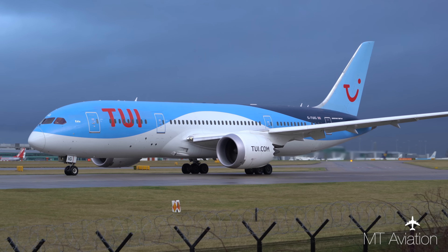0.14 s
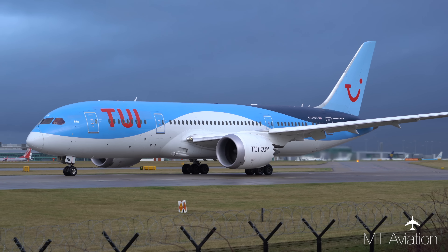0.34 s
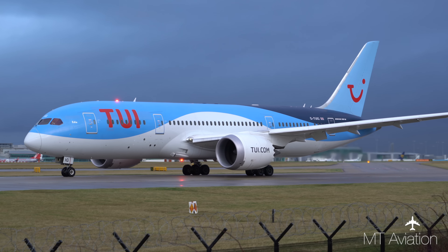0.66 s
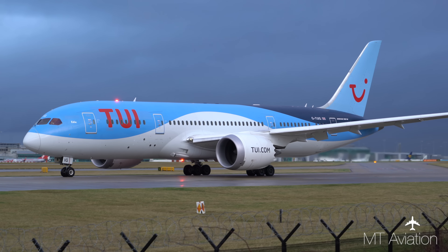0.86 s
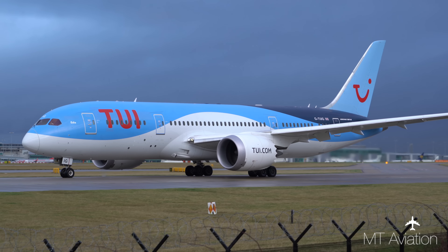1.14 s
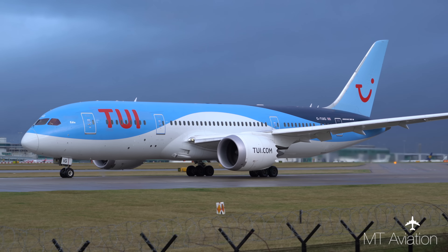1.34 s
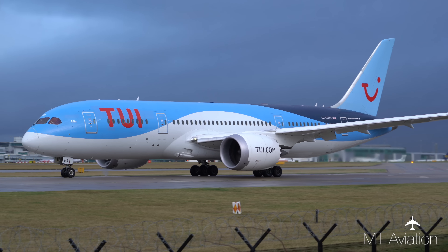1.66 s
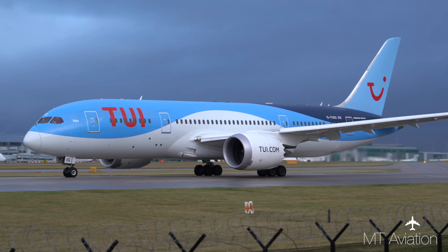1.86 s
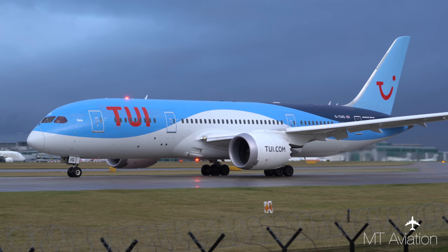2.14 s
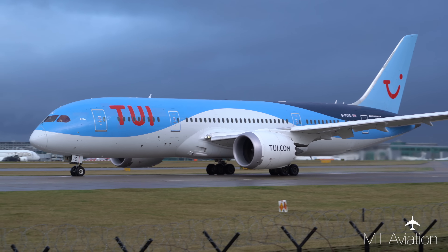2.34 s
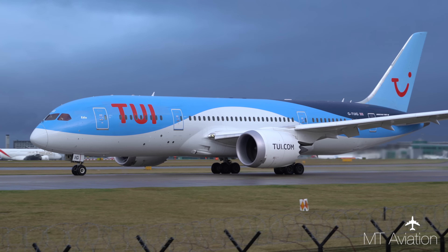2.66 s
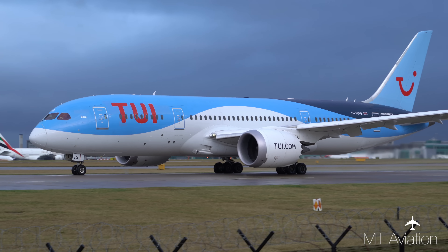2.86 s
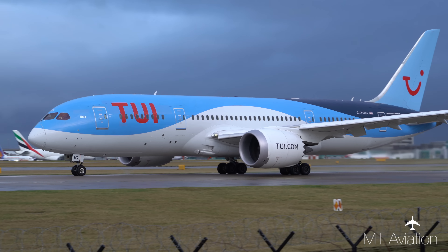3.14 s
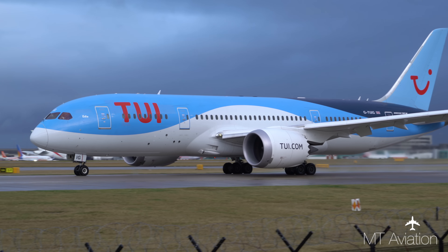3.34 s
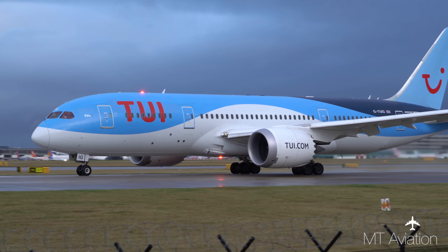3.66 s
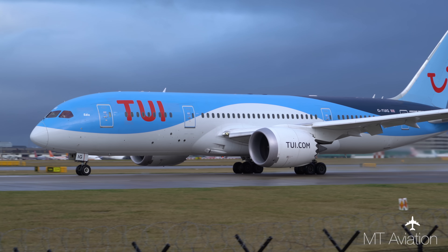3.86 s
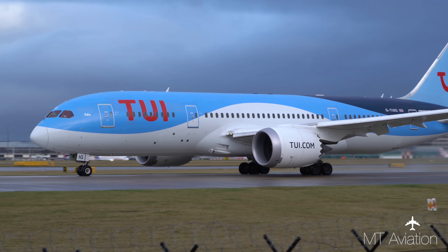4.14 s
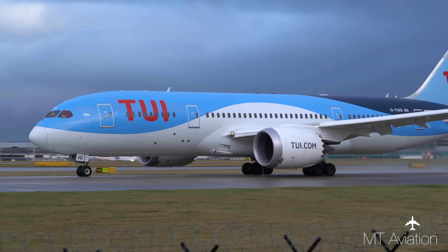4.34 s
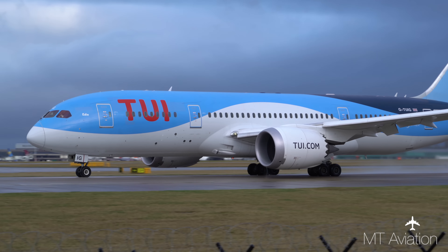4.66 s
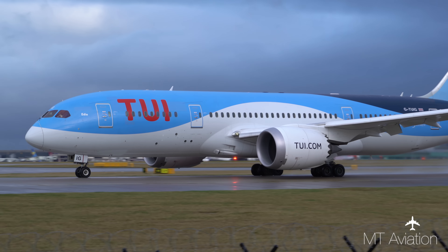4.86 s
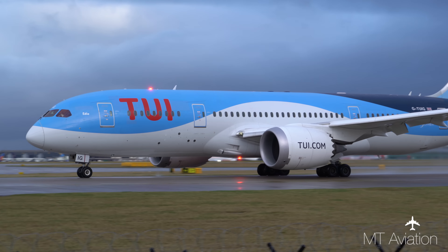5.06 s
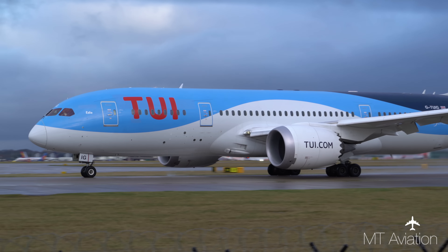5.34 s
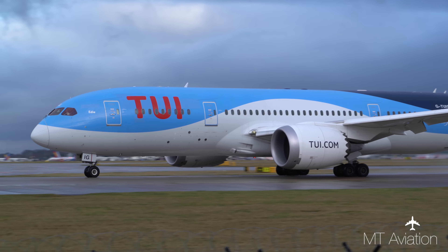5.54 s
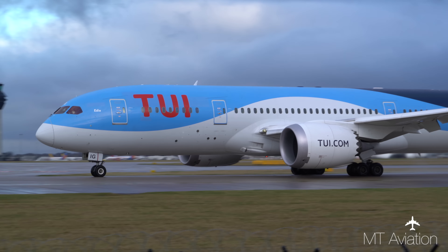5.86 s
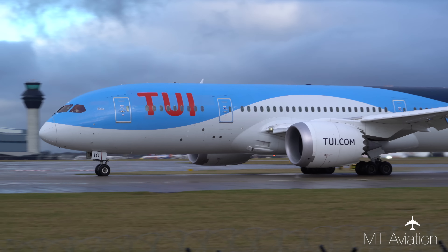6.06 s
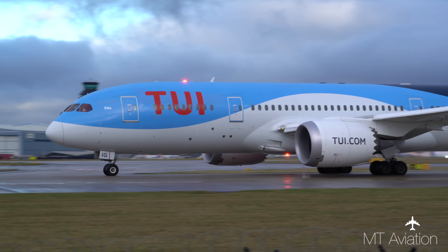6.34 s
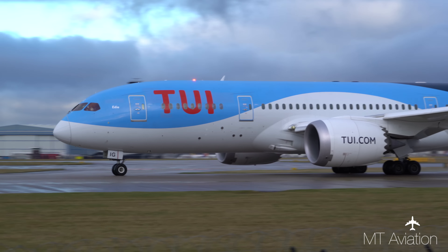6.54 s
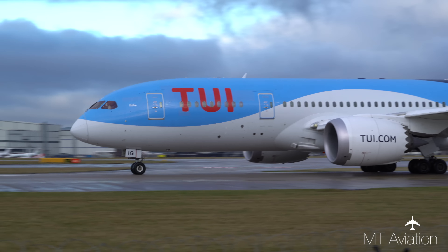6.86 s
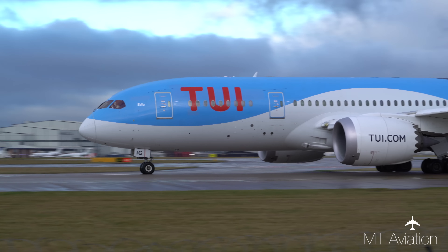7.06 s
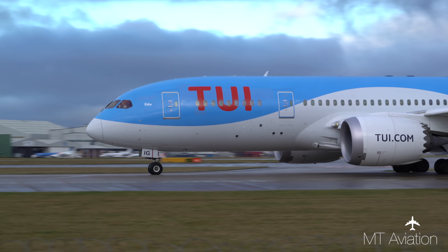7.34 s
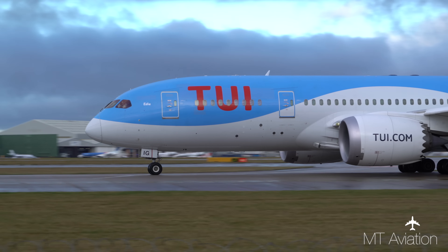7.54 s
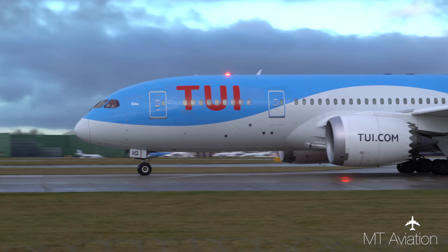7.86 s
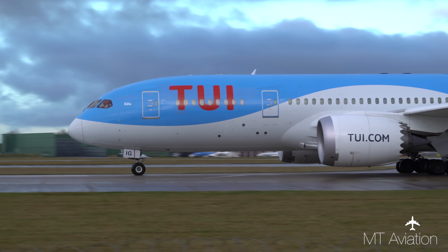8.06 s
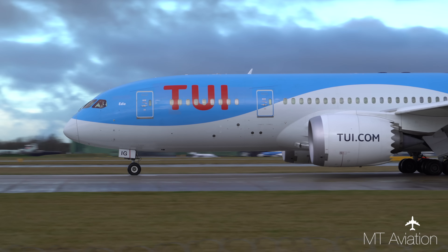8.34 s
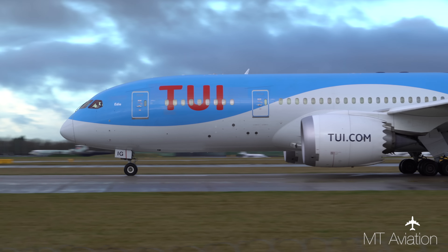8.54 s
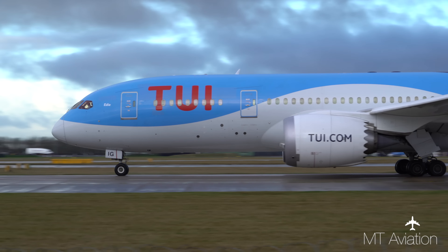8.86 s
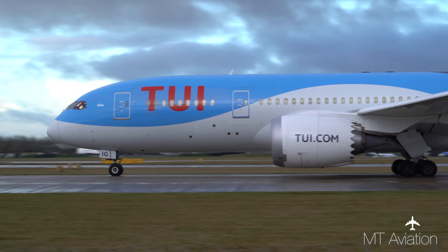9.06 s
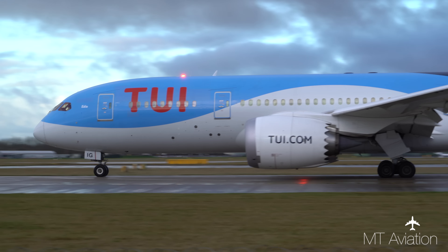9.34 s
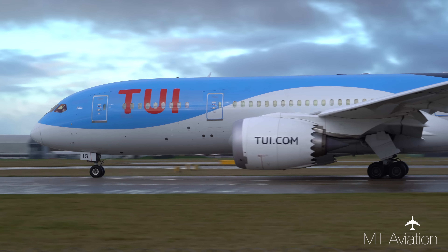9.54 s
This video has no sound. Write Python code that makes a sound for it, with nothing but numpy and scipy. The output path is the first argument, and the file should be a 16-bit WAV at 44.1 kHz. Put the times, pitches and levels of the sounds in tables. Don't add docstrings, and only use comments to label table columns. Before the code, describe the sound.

Jet engines climb from a whistling hum to a singing, fluttering howl, then a full rushing roar takes over as the airliner draws level outdoors.

```python
import sys
import numpy as np
from scipy import signal
from scipy.fft import rfft, irfft
from scipy.io import wavfile
from scipy.ndimage import uniform_filter1d, minimum_filter1d, map_coordinates

SR = 44100
rng = np.random.default_rng(int(sys.argv[2]) if len(sys.argv) > 2 else 0)


def undo_db(level):
    steps = np.asarray(level, float) / 20
    return 10 ** steps


def transcribe(signal):
    frames = np.atleast_2d(signal).T
    limited = np.clip(frames, -1, 1)
    pcm = np.round(limited * 32767).astype(np.int16)
    wavfile.write(sys.argv[1], SR, pcm)


N = 428211
CLOCK = np.arange(N) / SR
BINS = np.maximum(np.fft.rfftfreq(N, 1 / SR), 1)

# f/Hz, share of the panning, incoherent share far off, incoherent share abeam
PAIR = [(86.4, 0.0, .001, .001), (137, 0.0, 0.017, 0.023), (180, 0.12, 0.043, 0.089),
        (300.6, 0.11, 0.011, 0.06), (700.2, 0.64, 0.029, 0.017), (1400, 1.08, 0.082, 0.021),
        (3160, 1.07, 0.1, 0.37), (7140, 1.56, 0.095, 0.66), (14100, 1.6, 0.28, 0.25)]
# t/s, nearness (0 far ahead - 1 abeam)
APPROACH = [(0, 0.1), (2, 0.12), (3.2, 0.26), (5.2, 0.35), (6.2, 0.52), (7, 0.73), (8, 0.99), (9.71, 0.98)]
# f/Hz, idle level/dB, gain at full thrust/dB, gain abeam/dB
NOISE_DRIVE = [(115, -11, 8.5, 2), (213, -6, 0.2, 9.5), (1510, 1.83, -1.3, 0.56), (8100, -0.14, 2, -3.5)]


def near_fan(pan_db):
    # harmonic, from t/s, until t/s, level/dB
    near_beams = [(1, 1.96, 9.9, -33.5), (2, 2.1, 6.92, -29.5), (3, 1.1, 6.6, -32.5), (4, .4, 6.1, -33.5)]
    # t/s, harmonic, length/s, peak level/dB
    near_swells = [(1.762, 3, 0.08, -27), (1.92, 4, 0.35, -37), (2.106, 1, 0.074, -25.5),
                   (2.394, 2, 0.1, -27), (2.46, 3, 0.26, -26), (2.594, 2, 0.16, -26),
                   (2.636, 1, 0.13, -19.5), (2.77, 1, 0.048, -21.5), (3.023, 1, 0.26, -19.5),
                   (3.307, 2, 0.24, -23), (3.4, 1, 0.16, -27), (3.476, 3, 0.078, -23.5),
                   (3.606, 2, 0.057, -19), (3.668, 1, 0.057, -26.6), (3.74, 4, 0.15, -25),
                   (3.78, 3, 0.25, -30), (3.87, 1, 0.079, -21), (4.071, 1, 0.17, -21), (4.411, 3, 0.1, -27),
                   (4.505, 1, 0.16, -25), (4.88, 3, 0.14, -22), (5.184, 2, 0.3, -28),
                   (5.347, 2, 0.079, -28), (5.76, 2, 0.24, -51), (6.14, 1, 0.1, -26.3),
                   (6.461, 2, 0.1, -24), (6.72, 1, 0.2, -28.5), (6.781, 2, 0.19, -29),
                   (7.007, 1, 0.078, -24), (9.21, 1, 0.1, -30),
                   (3.04, 1, 0.94, -30), (2.8, 2, 0.83, -29), (1.96, 3, 0.69, -32), (2.3, 4, 0.54, -35),
                    (.55, 4, 0.13, -30), (0.97, 2, 0.41, -31), (1, 4, .25, -67), (1.7, 2, 0.46, -32.5),
                    (2.05, 3, 0.67, -32), (5.55, 3, .3, -26.5), (6.315, 3, .2, -31), (7.65, 1, 0.24, -30.5),
                    (8.551, 1, 0.16, -30), (5.396, 1, .12, -29), (5.75, 1, 0.055, -38)]
    blade_hz = blade_rate()
    rest_db = -44.5 - 6 * np.clip(CLOCK - 6.5, 0, 1)
    slow_db = 4.5 * np.clip(2 - CLOCK, 0, 1)
    stack = 0
    for beam in near_beams:
        k = round(beam[0])
        floor_db = rest_db - (k == 1) * slow_db
        line_db = soft_floor(harmonic_db(beam, near_swells), floor_db)
        line = tone(k * blade_hz, line_db, wander_hz=5.5 * k, flicker_db=2.8)
        stack = stack + panned(line, k * blade_hz, pan_db)
    return stack


def far_fan(pan_db):
    # t/s, lead/%
    fan_lead = [(0, 0), (1.6, 0.21), (2.3, 1.34), (3.2, 1.32), (4.4, 0.034), (9.71, 0)]
    # harmonic, from t/s, until t/s, level/dB
    far_beams = [(5, 2.6, 6.1, -34.5), (6, 2.105, 3.3, -36), (7, 2.23, 2.876, -40), (8, 2.5, 3.5, -42),
                 (9, 2.6, 3.1, -39)]
    # t/s, harmonic, length/s, peak level/dB
    far_swells = [(.35, 6, .12, -30), (1.32, 6, .15, -29), (1.33, 5, .25, -29), (1.55, 7, .15, -32),
                  (2.12, 6, .12, -29), (2.32, 7, .13, -31), (2.37, 6, .14, -25.5), (2.72, 9, .3, -36),
                  (2.75, 7, .35, -32), (2.72, 6, .1, -30), (2.78, 8, .45, -27), (2.96, 6, .18, -31),
                  (3.07, 5, .12, -28), (3.5, 6, .13, -33)]
    # harmonic, level/dB
    high_harmonics = [(10, -43), (11, -44), (12, -40), (13, -49)]
    lead = curves(fan_lead)[0]
    blade_hz = blade_rate() * (1 + lead / 100)
    spool_db = 10.0 * (np.clip(lead, 0, 1.4) - 1.4)
    stack = 0
    for beam in far_beams:
        k = round(beam[0])
        line_db = soft_floor(harmonic_db(beam, far_swells), spool_db - 45.0)
        line = tone(k * blade_hz, line_db, wander_hz=12.97, flicker_db=2.5)
        stack = stack + panned(line, k * blade_hz, pan_db)
    for k, line_db in high_harmonics:
        line = tone(round(k) * blade_hz, line_db + spool_db, wander_hz=14.6, flicker_db=5.0)
        stack = stack + panned(line, k * blade_hz, pan_db)
    return stack


def blade_rate():
    # t/s, blade-passing f/Hz
    spool_up = [(0, 331.4), (.5, 337.3), (1, 345), (1.25, 359.7), (1.5, 388), (2, 464), (2.25, 504.5),
                (2.5, 535), (2.75, 562.7), (3, 584), (3.5, 619.7), (4, 648), (4.5, 660.3), (5, 668.3),
                (6, 692), (7, 695.6), (9.71, 701.4)]
    return uniform_filter1d(curves(spool_up)[0], size=SR // 6, mode="nearest")


def harmonic_db(beam, swells):
    k, begin, end, beam_db = beam
    rise_db_s, fall_db_s = 21, 29
    line_db = beam_db - rise_db_s * np.maximum(begin - CLOCK, 0) - fall_db_s * np.maximum(CLOCK - end, 0)
    for t, harmonic, length, peak_db in swells:
        if round(harmonic) == round(k):
            line_db = soft_floor(line_db, peak_db - 3.0 * (2 * (CLOCK - t) / length) ** 2)
    return line_db


def tone(line_hz, line_db, wander_hz=7.0, flicker_db=3.5):
    phase = 2 * np.pi * np.cumsum(line_hz + wander_hz * walk(50.0)) / SR
    flicker = undo_db(flicker_db * walk(40.0))
    flicker = flicker / np.sqrt(np.mean(flicker ** 2))
    return np.sqrt(2) * undo_db(line_db) * flicker * np.sin(phase + 2 * np.pi * rng.random())


def roar(delay_ms, bounce, pan_db, scatter):
    # f/Hz, level/dB (the second column)
    colour = [(25, -49), (60, -16.5), (115, -8), (158, -12), (172, -19), (300, -13.5), (450, -4), (900, -2),
              (2000, -1), (4000, -4.5), (7000, -14), (9800, -24), (11500, -36), (15600, -49.5)]
    drive_db = noise_drive_db()
    drive_log_hz = np.log(np.array(NOISE_DRIVE)[:, 0])
    shape = undo_db(at(BINS, colour))
    spectra = [bounced(rfft(rng.standard_normal(N)) * shape, delay_ms, bounce) for _ in range(3)]
    gust, eddy = walk(11.0), walk(36.0)
    noise = np.zeros((2, N))
    for band_hz in 28 * 2 ** np.arange(0, 9.6, .5):
        mask = np.cos(np.pi * np.clip(np.log2(BINS / band_hz), -.5, .5)) ** 2
        place = np.interp(np.log(band_hz), drive_log_hz, np.arange(4))
        below = min(int(place), 2)
        band_db = drive_db[below] + (place - below) * (drive_db[below + 1] - drive_db[below])
        treble_waver = .3 * gust + 1.05 * eddy + 1.0 * walk(24.0)
        band_db = band_db + min(band_hz / 7000, 1) * treble_waver + .3 * walk(8.0)
        band_db = band_db + 0.42 * drive_db[0] * np.clip(np.log2(140 / band_hz), 0, 1)
        band_db = band_db + 25.0 * (scatter - .4) * max(np.log2(band_hz / 8000), 0)
        shared, left, right = (irfft(spectrum * mask, N) for spectrum in spectra)
        apart = at(band_hz, PAIR, count=2) * (1 - scatter) + at(band_hz, PAIR, count=3) * scatter
        apart = np.clip(apart, 0, 1)
        pair = np.sqrt(1 - apart) * shared + np.sqrt(apart) * np.array([left, right])
        noise += panned(undo_db(band_db) * pair, band_hz, pan_db)
    return noise * undo_db(-15.5) / noise.std()


def noise_drive_db():
    # t/s, length/s, change/dB
    surges = [(0.37, 0.29, 2.3), (1.03, 0.37, -1), (1.33, 0.38, 0), (1.69, 0.29, -1), (2.82, 0.34, 4),
              (3.29, 0.36, -1), (4.61, 0.4, 1), (4.98, 0.24, -3.5), (5.61, 0.46, 1), (6.84, 0.94, 1),
              (8.99, 0.26, -4.5), (9.37, 0.18, 1)]
    # t/s, length/s, change/dB
    gusts = [(0.39, 0.08, -2.2), (0.67, 0.23, 0.7), (1.3, 0.15, -2.2), (1.54, 0.24, 2), (2.16, 0.57, -0.8),
             (2.56, 0.17, 2.5), (2.9, 0.11, 1.6), (3.1, 0.23, -2.5), (3.26, 0.17, 2.5), (3.4, 0.13, -2),
             (3.51, 0.17, 1.5), (4.46, 0.078, -2.1), (4.78, 0.15, -2), (4.98, 0.19, 2), (5.18, 0.24, -1.5),
             (5.46, 0.078, 2), (6.2, 0.085, 1.5), (6.75, 0.36, -1.4), (7.04, 0.055, -1.8), (7.39, 0.3, 0.3),
             (7.93, 0.24, -1.9), (8.43, 0.31, 0.4), (8.93, 0.16, -1), (9.55, 0.083, 2)]
    # t/s, length/s, change/dB
    ducks = [
        (2.1, .3, 1.0),
        (2.6, 0.44, -2),
        (3.3, 0.67, -1.7),
        (4.0, .25, 0),
        (4.75, 0.31, 1.2),
        (6.5, .4, 0.5),
        (8.2, .3, -1),
        (9.1, .3, -1),
    ]
    blade_hz = blade_rate()
    thrust = (blade_hz - blade_hz.min()) / np.ptp(blade_hz)
    abeam = curves(APPROACH)[0]
    boom = 1 / (1 + np.exp((0.59 - thrust) / 0.098))
    surge, gust = bumps(surges), bumps(gusts)
    drives = [boom, thrust, thrust, thrust]
    air_db = [surge, 0.12 * surge, 0.05 * gust + bumps(ducks), 1.22 * gust]
    waver_db = [1, 1, .25, -0.6]
    levels = []
    for (_, idle_db, thrust_db, abeam_db), drive, air, waver in zip(NOISE_DRIVE, drives, air_db, waver_db):
        steady_db = idle_db + thrust_db * drive + abeam_db * abeam
        levels.append(steady_db + air + waver * walk(6.3))
    return np.array(levels)


def bounced(spectrum, delay_ms, bounce):
    phase_rad, top_hz = 0.41, 1120
    ground = spectrum * np.exp(-1j * phase_rad) / np.sqrt(1 + (BINS / top_hz) ** 2)
    reflection = delayed(irfft(ground, N), delay_ms * SR / 1000)
    return spectrum + rfft(np.clip(bounce, 0, 1) * reflection)


def humps(pan_db):
    # harmonic, half width/Hz, level/dB
    scattered = [(2, 90, -36.5), (4, 160, -32), (6, 180, -43), (8, 200, -28)]
    blade_hz = blade_rate()
    idle = np.clip((2.0 - CLOCK) / 0.93, 0, 1)
    turns = 2 * np.pi * np.cumsum(blade_hz) / SR
    total = 0
    for k, width_hz, hump_db in scattered:
        in_phase = walk(width_hz) * np.cos(round(k) * turns)
        quadrature = walk(width_hz) * np.sin(round(k) * turns)
        hump = idle * undo_db(hump_db) * (in_phase + quadrature)
        total = total + panned(hump, k * blade_hz, pan_db)
    return total


def whistles(pan_db):
    # from t/s, until t/s, f/Hz, level/dB
    compressor = [
        (-.1, 0.713, 3710, -28),
        (0.306, .85, 5010, -34),
        (3.705, 5.298, 1592, -33.5),
        (5.203, 5.898, 1630, -37),
        (-.1, 0.605, 4300, -39),
        (1.4, 1.75, 5300, -36),
        (1.4, 2.0, 7278, -40),
    ]
    total = 0
    for begin, end, line_hz, line_db in compressor:
        progress = np.clip((CLOCK - begin) / (end - begin), 0, 1)
        swell = np.sqrt(np.abs(np.sin(np.pi * progress)))
        line = swell * tone(line_hz, line_db, wander_hz=4.45, flicker_db=1.0)
        total = total + panned(line, line_hz, pan_db)
    return total


def apron():
    # t/s, level/dB
    drone_level = [(0, -47), (.5, -43.5), (.9, -55), (2, -49), (3, -56.5), (6, -54), (9.71, -64)]
    centre_hz, octaves = 181, 0.6
    shape = np.exp(-(np.log2(BINS / centre_hz) / octaves) ** 2)
    shared, left, right = (irfft(rfft(rng.standard_normal(N)) * shape, N) for _ in range(3))
    drone = shared + 0.43 * np.array([left, right])
    return drone / drone.std() * undo_db(curves(drone_level)[0])


def panned(x, source_hz, pan_db):
    half = pan_db * at(source_hz, PAIR) / 2
    return x * undo_db(np.array([half, -half]))


def delayed(x, samples):
    return map_coordinates(x, [np.arange(N) - samples], order=3, mode="mirror")


def soft_floor(level_db, rest_db):
    return 10 * np.log10(undo_db(2 * level_db) + undo_db(2 * rest_db))


def bumps(events):
    return sum(change * np.exp(-2.8 * ((CLOCK - t) / length) ** 2) for t, length, change in events)


def walk(rate):
    k = int(SR / rate)
    held = np.repeat(rng.standard_normal(N // k + 1), k)
    smooth = uniform_filter1d(uniform_filter1d(held, k), k)[:N]
    return (smooth - smooth.mean()) / smooth.std()


def curves(table):
    t, *columns = np.transpose(table)
    return [np.interp(CLOCK, t, column) for column in columns]


def at(f, table, count=1):
    table = np.array(table)
    return np.interp(np.log(f), np.log(table[:, 0]), table[:, count])


def scene():
    # t/s, share (0-1)
    bounce_share = [(0, 0.27), (1.7, 0.28), (2.2, 0.23), (6.3, 0.25), (7.2, 0.3), (9.71, 0.29)]
    abeam, bounce = curves(APPROACH)[0], curves(bounce_share)[0]
    delay_ms = 1.49 + (2.407 - 1.49) * abeam
    pan_db = -1.5 + (-6 + 1.5) * abeam
    lag_samples = .1 + (1.2 - .1) * abeam
    scatter = np.clip(0.01 + (0.79 - 0.01) * abeam, 0, 1)
    fans = near_fan(pan_db) + far_fan(pan_db) + whistles(pan_db)
    left, right = fans + roar(delay_ms, bounce, pan_db, scatter) + humps(pan_db)
    return np.array([delayed(left, lag_samples), right]) + apron()


def top_cut(x):
    return signal.sosfilt(signal.butter(12, 15710, fs=SR, output="sos"), x)


def record(dry):
    room_left = np.minimum(.86 / np.abs(dry).max(axis=0), 1)
    gain = uniform_filter1d(minimum_filter1d(room_left, size=129), size=129)
    return top_cut(dry * gain)


dry = scene()
out = record(dry)
transcribe(out)
```